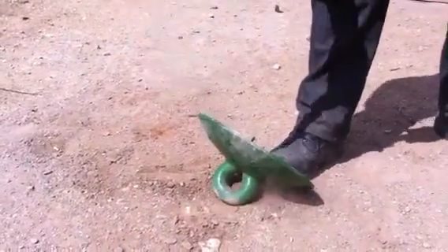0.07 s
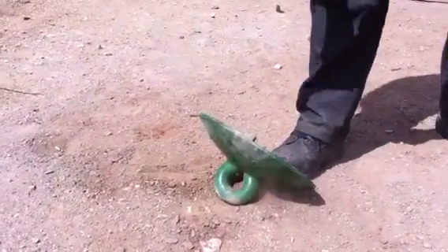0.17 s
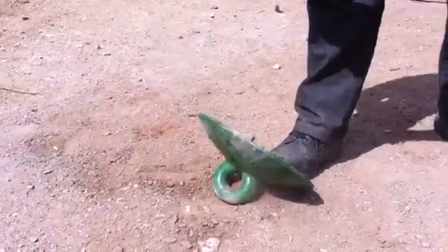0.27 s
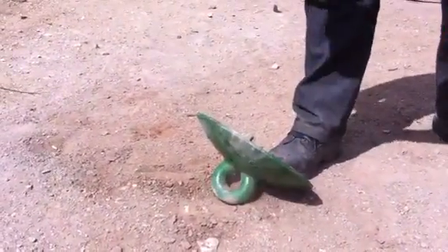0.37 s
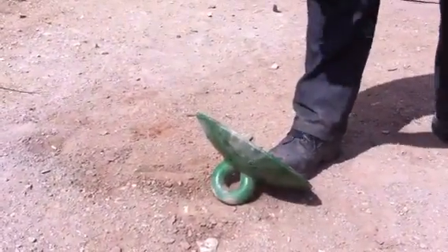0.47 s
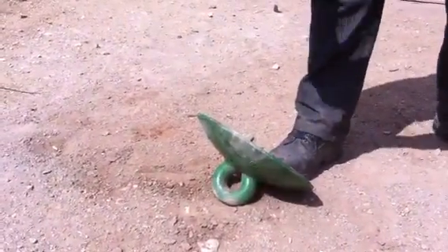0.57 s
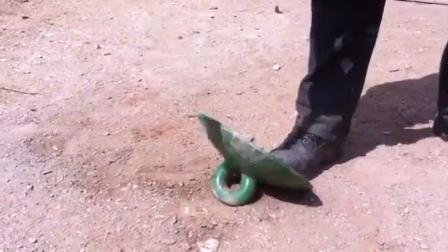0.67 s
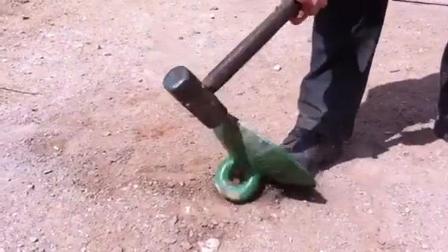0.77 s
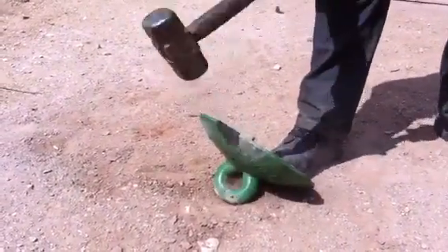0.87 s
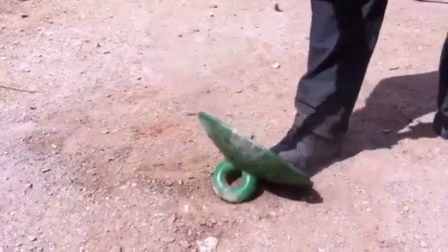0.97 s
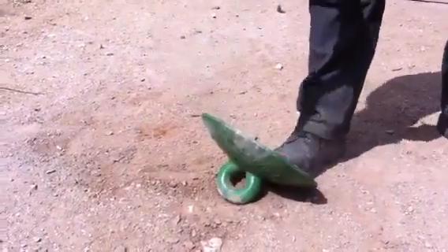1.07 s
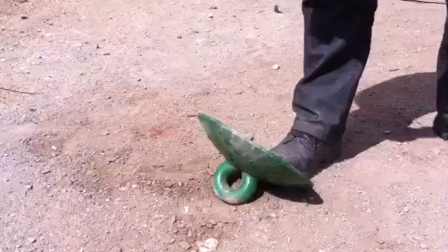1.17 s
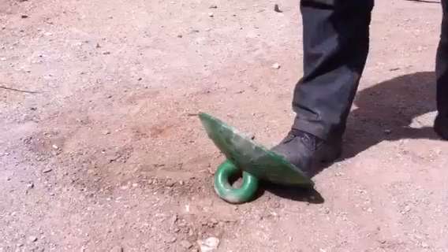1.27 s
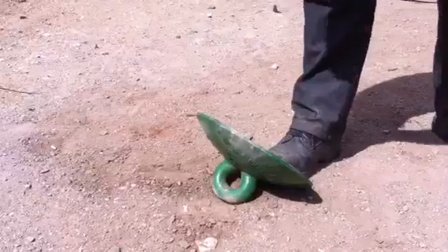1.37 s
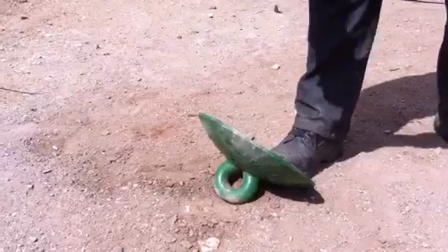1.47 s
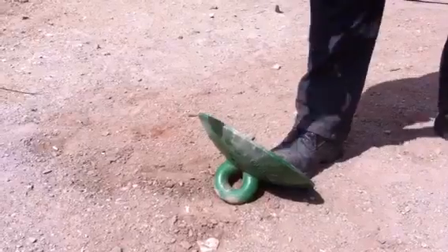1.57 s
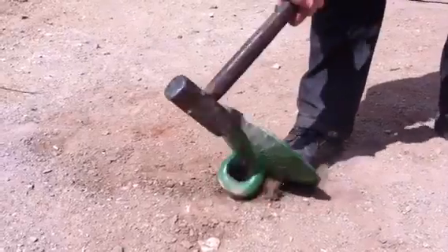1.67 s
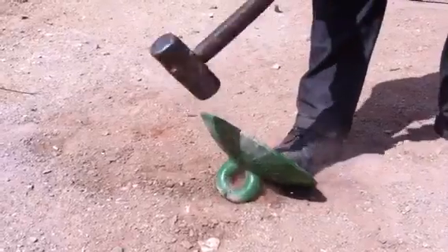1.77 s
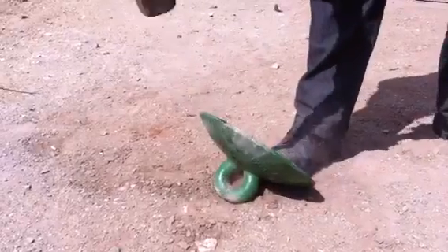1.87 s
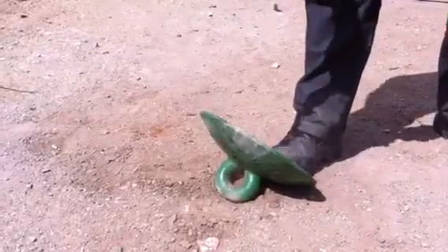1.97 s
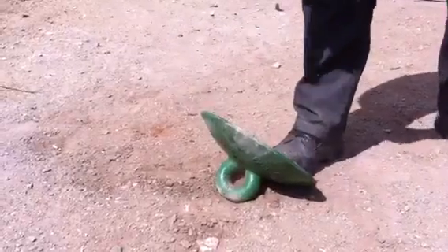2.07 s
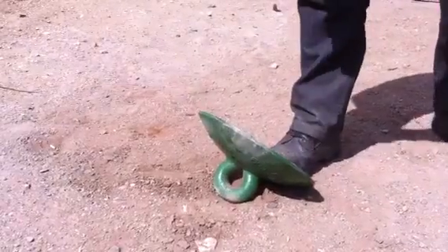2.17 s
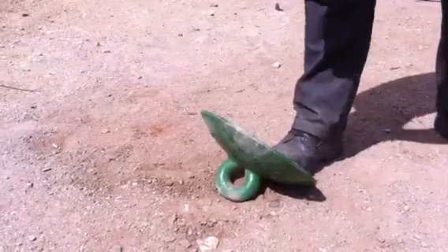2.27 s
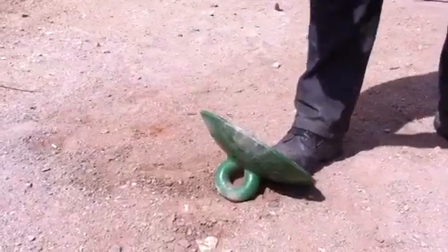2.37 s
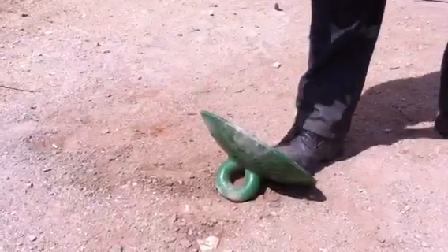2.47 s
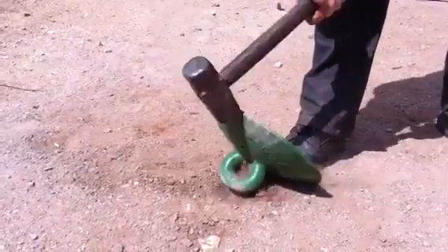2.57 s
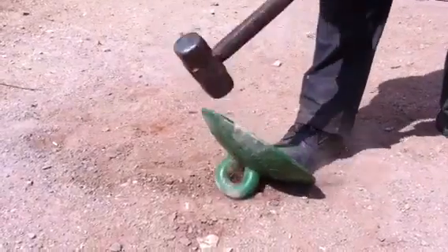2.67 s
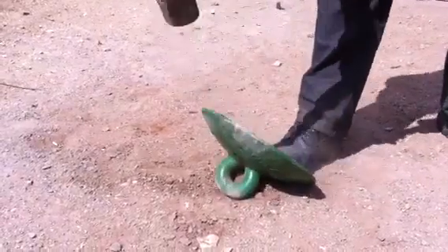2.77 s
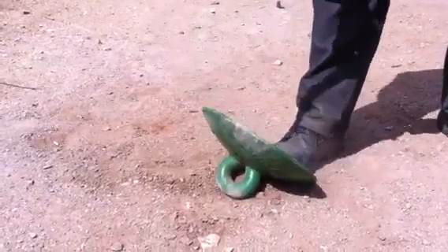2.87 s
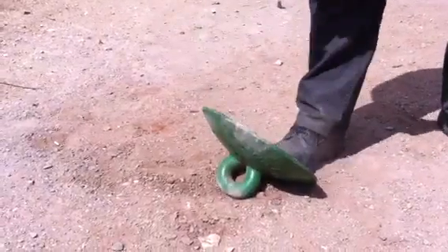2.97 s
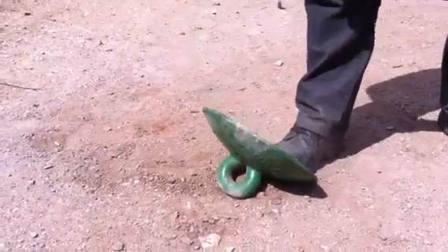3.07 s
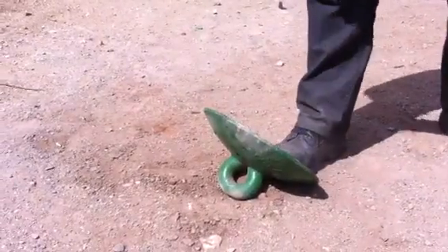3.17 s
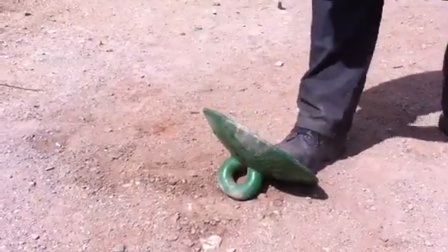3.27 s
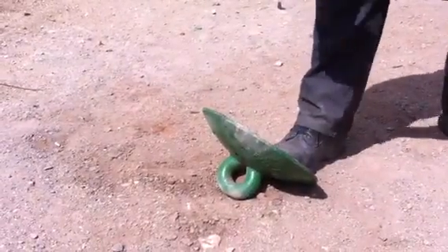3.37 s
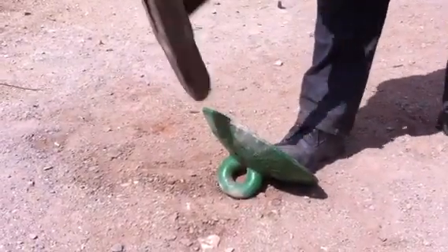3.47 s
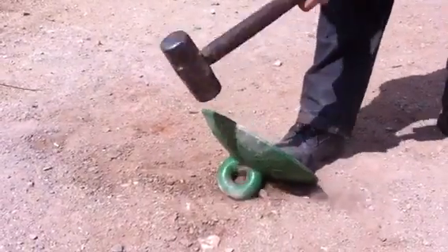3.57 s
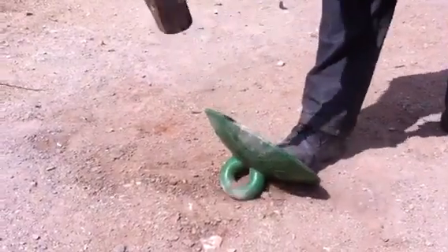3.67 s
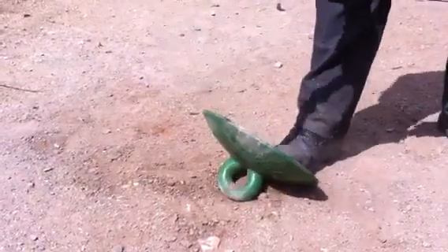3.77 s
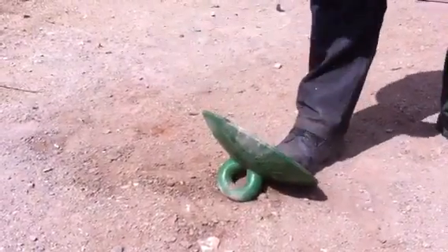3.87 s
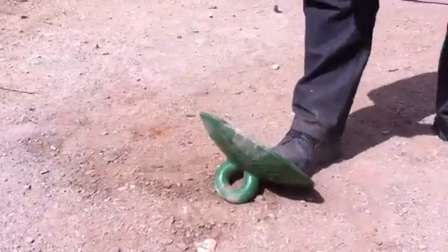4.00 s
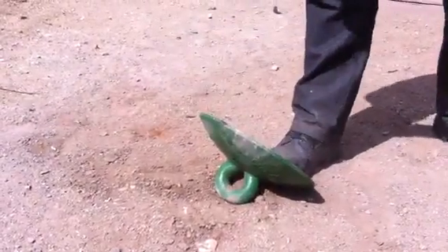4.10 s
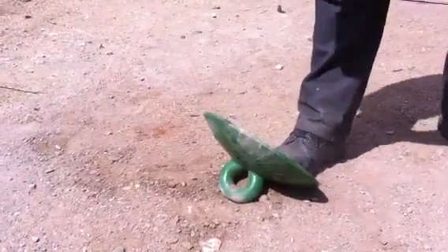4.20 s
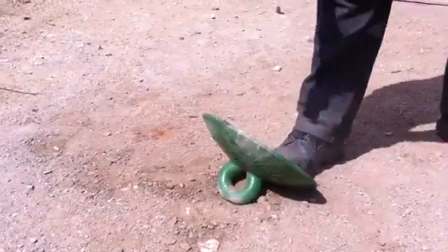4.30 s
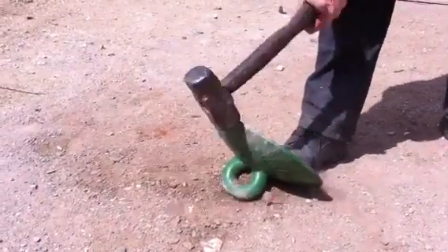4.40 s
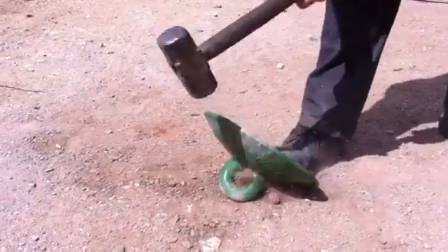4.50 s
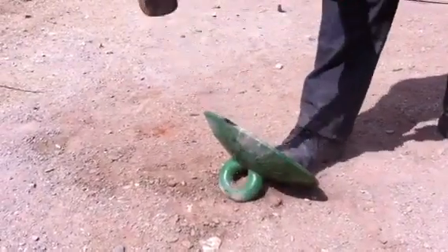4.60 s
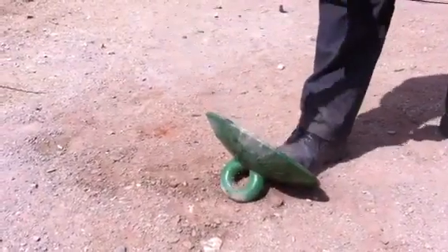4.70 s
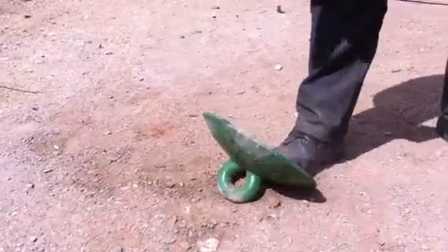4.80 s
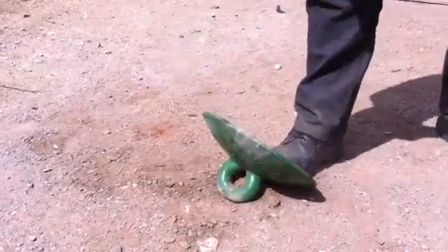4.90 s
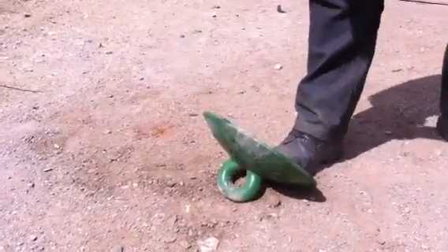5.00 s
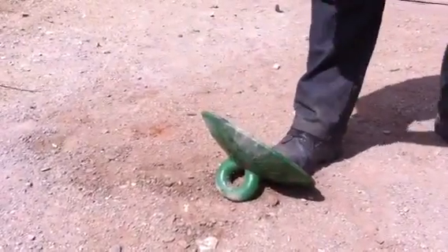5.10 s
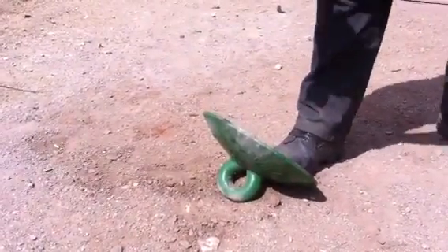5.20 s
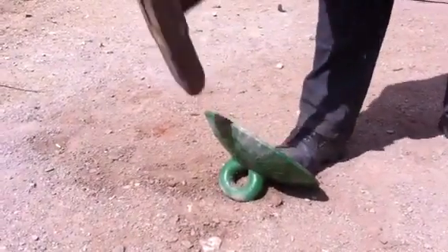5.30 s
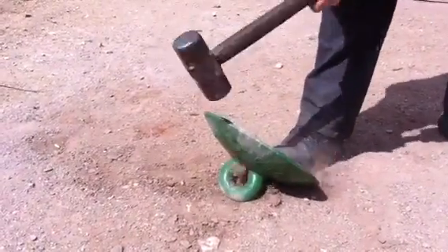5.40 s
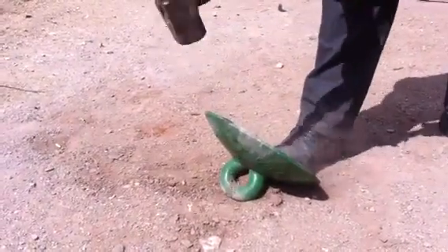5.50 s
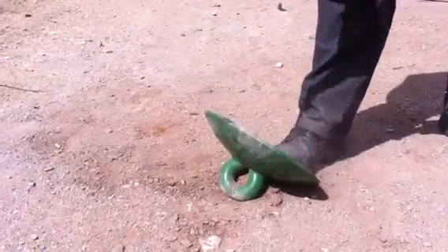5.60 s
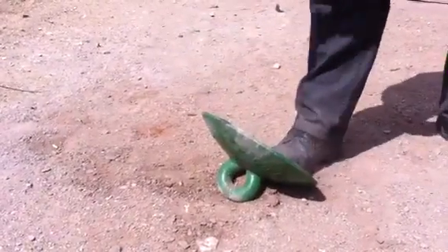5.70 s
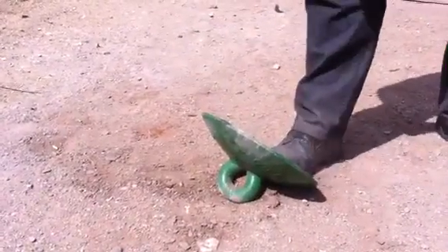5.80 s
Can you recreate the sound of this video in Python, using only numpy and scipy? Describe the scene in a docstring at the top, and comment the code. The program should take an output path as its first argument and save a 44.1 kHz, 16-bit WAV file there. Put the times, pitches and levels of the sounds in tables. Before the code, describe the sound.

A close, single-channel outdoor sound of a sledgehammer striking a heavy steel disc on gravel. It begins inside the bright ringing tail of a blow just landed. Further blows come at about 0.85, 1.75, 2.7, 3.6, 4.55 and 5.45 seconds. Each is a harsh, slightly overloaded crack with a dense, inharmonic clang, strongest from about 1 to 5 kHz, dying within a few tenths of a second, plus a dull thump and rough gravel chatter. The strikes differ in brightness; the one at 1.75 rings more strongly in the upper mids. A thin, very high whine from the hammer head bends in pitch, clearer from 2.7 onward. A diffuse yard echo trails each hit. Soft thuds follow as the disc rocks. Between blows are quiet low air noise, faint swelling hiss, tiny bird chirps near 1.65 and 3.5, and light wind bumps, mostly after 4.4.

```python
"""A sledgehammer strikes the rim of a cast steel disc that lies on gravel, held down by a boot, about once a second.
Each blow is a noise-burst crack, decaying disc modes, a dull ground thump and gravel chatter.
The hammer head's own modes sing on, Doppler-shifted by the swing, and shaped noise gives the yard's echo.
A far bird chirps in gliding sines, wind and open air are coloured noise, and the blows overload the recorder."""
import sys
import numpy as np
from scipy import signal
from scipy.fft import rfft, irfft, next_fast_len
from scipy.io import wavfile
from scipy.ndimage import map_coordinates

SR = 44100
rng = np.random.default_rng(int(sys.argv[2]) if len(sys.argv) > 2 else 0)


def unload_wav(signal):
    """Save mono or channel-first audio to the path in sys.argv[1] as 16-bit WAV at rate SR, clipped to [-1, 1]."""
    wavfile.write(
        sys.argv[1],
        SR,
        np.round(np.clip(np.atleast_2d(signal).T, -1, 1) * 32767).astype(np.int16),
    )


N = 257984
TIME = np.arange(N) / SR
AGE = np.arange(SR) / SR  # time since an event began, s
TOP_HZ = 15900  # the recorder's band limit


def amp(db):
    """Level law: decibels to amplitude gain."""
    return 10 ** (np.asarray(db) / 20)


def unit(x):
    """Normalisation to an rms of 1."""
    return x / np.sqrt(np.mean(x ** 2) + 1e-20)


def along(points, hz):
    """Interpolation of (frequency, value) points on a logarithmic frequency axis."""
    point_hz, value = np.transpose(points)
    return np.interp(np.log(hz + 1), np.log(point_hz), value)


def fade(t60):
    """Exponential damping: the level falls 60 dB in t60 seconds."""
    return np.exp(-np.log(1000) * AGE / t60)


def filtered(x, response):
    """Linear filtering: the spectrum of x times a response of frequency."""
    size = next_fast_len(len(x) + SR // 4)
    spectrum = rfft(x, size) * response(np.fft.rfftfreq(size, 1 / SR))
    return irfft(spectrum, size)[:len(x)]


def noise(spectrum, size):
    """Coloured noise: white noise shaped by a spectrum in dB, at rms 1."""
    return unit(filtered(rng.standard_normal(size), lambda hz: amp(along(spectrum, hz))))


def wobble(rate, size):
    """Slow random modulation: a smooth curve through `rate` random knots a second."""
    knots = rng.standard_normal(4096)
    return map_coordinates(knots, [np.arange(size) * rate / SR], mode="wrap")


def add(track, s, sound):
    """Superposition: mix a sound into the track at time s, which may lie before the start."""
    start = round(s * SR)
    part = sound[max(-start, 0):N - start]
    track[max(start, 0):][:len(part)] += part


# spectrum of the open air: pitch_hz, relative level_db per Hz
AIR_SPECTRUM = [(15, -61), (25, -34), (33, -50), (84, -23.5), (123, 1), (195, -0.5), (217, -2.5),
                (545, -6.5), (607, -8.5), (1290, -10.5), (1700, -7), (2350, -18.5), (4250, -19.5),
                (14000, -37), (16000, -32.5)]


def open_air(db=-56):
    """Ambient noise: a stationary spectrum whose level drifts slightly."""
    drift_db = .5 * wobble(5.5, size=N)
    return amp(db + drift_db) * noise(AIR_SPECTRUM, size=N)


# spectrum of the faint hiss: pitch_hz, relative level_db per Hz
HISS_SPECTRUM = [(1000, -4), (3500, -9.5), (6000, -5), (9500, -11.5), (13000, -17), (15500, -12.5)]
# swells of the hiss: start_s, hold_s, level_db
HISS_SPELLS = [(2.41, .68, -58), (4.02, .7, -58), (5.45, .5, -61.5)]


def faint_hiss(rest_db=-70, attack_s=.02, release_s=.17):
    """Amplitude envelope on noise: the hiss swells abruptly, holds and fades exponentially."""
    level = np.full(N, amp(rest_db))
    for s, hold, db in HISS_SPELLS:
        attack = np.clip((TIME - s) / attack_s, 0, 1)
        release = np.exp(-np.maximum(TIME - s - hold, 0) / release_s)
        level = np.maximum(level, amp(db) * attack * release)
    return level * noise(HISS_SPECTRUM, size=N)


# soft wind bumps on the microphone: centre_s, level_db, half_width_s
WIND_BUMPS = [(3.465, -49, 0.012), (4.383, -43, 0.0083), (5.151, -51, 0.04), (5.29, -51.5, 0.016),
              (5.366, -41, 0.046), (5.68, -47, 0.033), (5.834, -50.5, 0.044)]
# spectrum of the buffeting: pitch_hz, relative level_db per Hz
BUFFET_SPECTRUM = [(40, -47.5), (110, 4.5), (170, 4.5), (260, 2.5), (450, -15), (1200, -63)]


def wind():
    """Pressure buffeting: puffs of air bump the microphone, low noise under bell-shaped envelopes."""
    push = sum(amp(db) * np.exp(-((TIME - s) / width) ** 2 / 2) for s, db, width in WIND_BUMPS)
    return push * noise(BUFFET_SPECTRUM, size=N)


# bird calls: start_s, length_s, mid pitch_hz, rise_octaves, warble depth_octaves (each way), level_db
BIRD_CALLS = [(1.626, 0.08, 4180, 0.043, .01, -50.5), (1.68, .04, 3630, .35, .02, -59),
              (3.47, 0.13, 4210, 0.052, .1, -58.5)]


def bird(warble_hz=30.2, edge_s=.012):
    """Frequency modulation: short, scratchy calls glide up and warble, blurred by distance."""
    song = np.zeros(N)
    for s, length, hz, rise, warble, db in BIRD_CALLS:
        glide = rise * (np.minimum(AGE / length, 1) - .5)
        octaves = glide - warble * np.cos(2 * np.pi * warble_hz * AGE)
        scratch = 1 + .02 * wobble(600, size=SR)
        pitch = hz * 2 ** octaves * scratch
        gate = np.clip(np.minimum(AGE, length - AGE) / edge_s, 0, 1)
        add(song, s, amp(db) * gate * np.sin(2 * np.pi * np.cumsum(pitch) / SR))
    scatter = rng.standard_normal(SR) * fade(.3)
    return song + .5 * signal.fftconvolve(song, scatter / np.linalg.norm(scatter))[:N]


# spectrum of the yard's answer: pitch_hz, relative level_db per Hz
YARD_SPECTRUM = [(80, -26.5), (250, -18), (700, 2.5), (1400, -3.5), (2000, 2.5), (2500, -8), (3300, -8),
                 (5000, -9), (8500, -7.5), (11000, -24), (15500, -35)]
# reverberation time of the yard: pitch_hz, t60_s
YARD_DECAY = [(200, 0.92), (2000, 0.94), (5000, 0.85), (9000, 0.3), (15000, 0.43)]


def yard(x, db=-25, arrival=0.02):
    """Diffuse reflection: echoes from far walls build up late, arrive in clumps and die sooner in the treble."""
    hz, t, bins = signal.stft(noise(YARD_SPECTRUM, size=SR), SR, nperseg=256)
    decay = np.exp(-np.log(1000) * t / along(YARD_DECAY, hz)[:, None])
    tail = signal.istft(bins * decay, SR, nperseg=256)[1][:SR]
    clumps = amp(2 * wobble(150, size=SR))
    tail = tail * (1 - np.exp(-(AGE / arrival) ** 2)) * clumps
    return amp(db) * signal.fftconvolve(x, tail / np.linalg.norm(tail))[:SR]


def thump(hz, t60=0.043, rise=0.0061):
    """Damped oscillation: the disc is driven into the packed ground for a few dull cycles."""
    return np.sin(2 * np.pi * hz * AGE) * fade(t60) * (1 - np.exp(-AGE / rise)) * 2


# dull thuds: the disc rocking back after a blow, and later the boot shifting: start_s, level_db (gain on a
# thump)
THUDS = [(0.936, -35), (1.851, -36), (2.777, -30.5), (3.687, -32), (4.688, -36), (5.021, -26),
         (5.641, -26.5)]


def settle(hz=175, t60=0.03):
    """Damped oscillation: soft thuds as the disc rocks back and the boot shifts."""
    track = np.zeros(N)
    for s, db in THUDS:
        add(track, s, amp(db) * thump(hz, t60))
    return track


# spectrum of the disc chattering on stones: pitch_hz, relative level_db per Hz
RATTLE_SPECTRUM = [(60, -21.5), (170, -3.5), (400, -8), (900, -2), (2000, -0.5), (2800, -3), (3250, -13.5),
                   (4200, -2.5), (7000, -14), (11000, -27), (15500, -26)]


def rattle(db=-19, t60=0.24, rough_db=-0.5):
    """Repeated random contact: the shaking disc chatters on the gravel as rough, decaying noise."""
    return amp(db + rough_db * wobble(320, size=SR)) * noise(RATTLE_SPECTRUM, size=SR) * fade(t60)


# bands of a soft, blurred ring: pitch_hz, width_hz, relative level_db
AFTER_RING_BANDS = [(2510, 9.3, -4), (2790, 54, 0.5), (3690, 61, -4), (4680, 70, -4), (5450, 68, -8.5),
                    (6940, 140, -9.5)]


def after_ring(db=-40, t60=0.9, rise=.03):
    """Narrow-band noise: a soft, blurred after-ring outlasts the clang."""
    def bands(f):
        return sum(amp(level) * np.exp(-((f - hz) / width) ** 2) / np.sqrt(width)
                   for hz, width, level in AFTER_RING_BANDS)
    blurred = unit(filtered(rng.standard_normal(SR), bands))
    return amp(db) * blurred * fade(t60) * (1 - np.exp(-AGE / rise))


# The head speeds away from the microphone until it turns, then is pulled back.
TURN_S, LIFT_M_PER_S2, PULL_M_PER_S2 = .45, 8.2, 18
# It beams its ring sideways: weak at first, opening out, with a null at the turn, lost as it comes down.
FACING_DB, FACING_DB_PER_S, NULL_DB, NULL_S, LOST_S = -2.5, 10.5, -10.5, 0.097, .82


def swing():
    """Kinematics and directivity: the head's speed away (m/s) and the gain of its ring after a blow."""
    speed = LIFT_M_PER_S2 * np.minimum(AGE, TURN_S) - PULL_M_PER_S2 * np.maximum(AGE - TURN_S, 0)
    null_db = NULL_DB * np.exp(-((AGE - TURN_S) / NULL_S) ** 2)
    facing_db = FACING_DB + FACING_DB_PER_S * AGE + null_db
    lost = np.exp(-(AGE / LOST_S) ** 12)
    return speed, amp(facing_db) * lost


# the hammer head's modes: pitch_hz (at rest), level_db (before the blow's gain), t60_s (before the swing's gain)
HEAD_MODES = [(8660, -45, 2.1), (13410, -37, .45)]


def hammer(ground_db=-3, ground_life=0.34):
    """Doppler effect: the head sings on through the swing; its ground reflection shifts less and beats with it."""
    speed, facing = swing()
    delay = np.cumsum(speed) / SR / 343  # distance over the speed of sound, 343 m/s

    def ring(t):
        return sum(amp(db) * fade(t60) * np.sin(2 * np.pi * hz * t) for hz, db, t60 in HEAD_MODES)

    ground = amp(ground_db) * np.exp(-(AGE / ground_life) ** 4) * ring(AGE - delay / 3)
    return (ring(AGE - delay) + ground) * facing


def overtones(db=-41, t60=.17, slope_db=-5, spread_db=4, low_hz=5600, count=40):
    """Additive synthesis: a fresh random cluster of weak, high, short ringing tones at each blow."""
    hz = rng.uniform(low_hz, TOP_HZ, (count, 1))
    level = db + slope_db * np.log2(hz / low_hz) + spread_db * rng.standard_normal((count, 1))
    tones = amp(level) * np.sin(2 * np.pi * (hz * AGE + rng.random((count, 1))))
    return np.sum(tones, 0) * fade(t60)


SPOT_HZ, SPOT_WIDTH_HZ = 4510, 340  # the modes that depend most on the spot struck
TILT_PIVOT_HZ = 3000
# the disc's modes: pitch_hz, level_db (before the blow's weighting), t60_s
DISC_MODES = [(712, -23, .22), (1228, -12, .19), (1935, -29, .36), (2065, -25, .27), (2502, -12, .21),
              (2544, -23, .28), (2515, -41, .95), (2765, -30, .45), (3692, -30, .2), (3718, -40, .65),
              (3864, -21, .09), (4266, -16, .33), (4473, -19, .29), (4761, -24, .36), (5160, -23, .26),
              (5420, -26, .25), (5463, -26, .3), (6678, -22, .19), (6858, -30, .25), (8297, -35, .3),
              (8340, -29, .18), (8487, -32, .2), (8760, -39, .3), (9136, -38, .33), (9810, -36, .19),
              (10350, -35, .26), (10510, -40, .22), (11992, -33, .19), (12450, -38, .2), (14158, -31, .28),
              (15112, -39, .16), (15620, -46, .26)]


def disc(ring_db, tilt_db, spot_gain_db, rise=0.003):
    """Modal superposition: the spot struck weights the modes; uneven boot and stone pressure makes them waver."""
    ring = np.zeros(SR)
    for hz, db, t60 in DISC_MODES:
        spot_share = np.exp(-((hz - SPOT_HZ) / SPOT_WIDTH_HZ) ** 2)
        spot_db = tilt_db * np.log2(hz / TILT_PIVOT_HZ) + spot_gain_db * spot_share
        level = db + ring_db + spot_db + rng.standard_normal()
        phase = 2 * np.pi * (hz * AGE + rng.random()) + .1 * wobble(70, size=SR)
        ring += amp(level) * fade(t60) * np.sin(phase)
    return ring * (1 - np.exp(-AGE / rise))


# spectrum of the contact crack: pitch_hz, relative level_db per Hz (before the blow's tilt)
CRACK_SPECTRUM = [(60, -15.5), (200, -7.5), (500, -0.5), (720, -8.5), (1100, 1.5), (1600, -3.5), (2200, 0),
                  (2700, -2), (3250, -11.5), (4200, -1), (4750, 4), (6100, -11.5), (7100, -7), (11000, -16),
                  (15500, -18)]


def crack(tilt_db, db=-6, length=0.0083):
    """Impact: steel on steel bursts while the hammer drives the disc down; a squarer hit sounds brighter."""
    colour = [(hz, level + tilt_db * np.log2(hz / 2000)) for hz, level in CRACK_SPECTRUM]
    contact = 1 - np.exp(-AGE / .0006)
    return amp(db) * noise(colour, size=SR) * contact * np.exp(-(AGE / length) ** 2)


# Each blow lands on another spot of the rim, which feeds or starves the disc's modes around 4.5 kHz.
# Levels are gains on each part: start_s, crack level_db, crack tilt_db per octave, ring level_db,
# ring tilt_db per octave, 4.5 kHz modes level_db, thump pitch_hz, thump level_db, hammer ring level_db
BLOWS = [(-.085, 7, 3.8, 1.5, 3.5, -12.5, 200, -3.5, -10.5),
         (0.8409, 1.5, -0.3, -2, 3, -1.5, 467, -18.5, -18),
         (1.7599, 1, 0.54, -3, 1.6, 11, 190, -33.5, -16.5), (2.6849, 0.5, -1, 1, 0.4, 2.5, 218, -16, -1.5),
         (3.6172, -0.5, -0.5, -4, -.8, 3, 200, -14.5, -2.5),
         (4.533, 1.5, 0.45, 3, 1.74, -3, 400, -18.5, -2.5), (5.4548, 2.5, 0, -1, 1, -3, 169, -17, -1.5)]


def blows(beam_db=-7):
    """Impact excitation: each blow and its echo; the disc beams its ring upward, so less reaches the walls."""
    track = np.zeros(N)
    for (s, crack_db, crack_tilt_db, ring_db, ring_tilt_db, spot_gain_db,
         thump_hz, thump_db, head_db) in BLOWS:
        contact = amp(crack_db) * (crack(crack_tilt_db) + rattle()) + amp(thump_db) * thump(thump_hz)
        ring = disc(ring_db, ring_tilt_db, spot_gain_db) + overtones() + amp(head_db) * hammer()
        echo = yard(contact + amp(beam_db) * ring)
        add(track, s, contact + ring + after_ring() + echo)
    return track


def scene():
    """Superposition: the hammering in its yard, as one channel."""
    background = open_air() + faint_hiss()
    return (background + wind() + bird() + settle() + blows())[None]


def record(dry, low_cut_hz=65):
    """Band limiting and saturation: deep bass is cut, the loudest peaks rounded, the top removed."""
    low_cut = signal.butter(2, low_cut_hz, "high", fs=SR, output="sos")
    x = signal.sosfilt(low_cut, dry[0])
    clipped = x / (1 + (x / .7) ** 4) ** (1 / 4)  # peaks approach 0.7
    return filtered(clipped, lambda hz: np.clip((TOP_HZ - hz) / 400 + .5, 0, 1))[None]


dry = scene()
out = record(dry)
unload_wav(out)
```